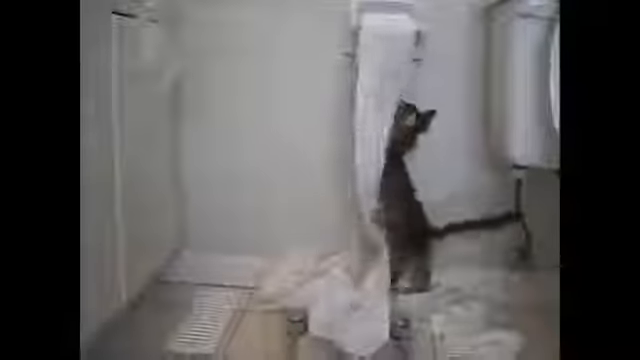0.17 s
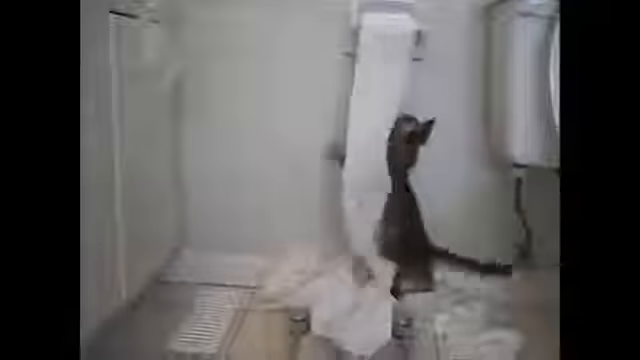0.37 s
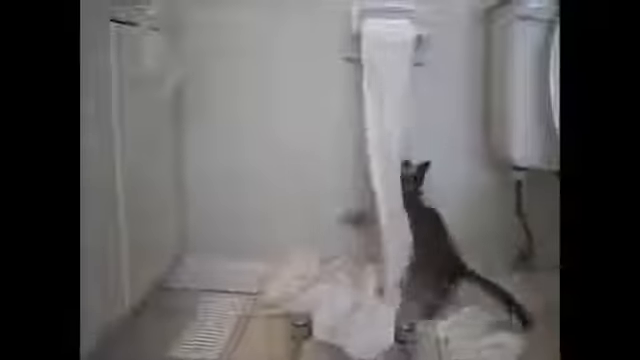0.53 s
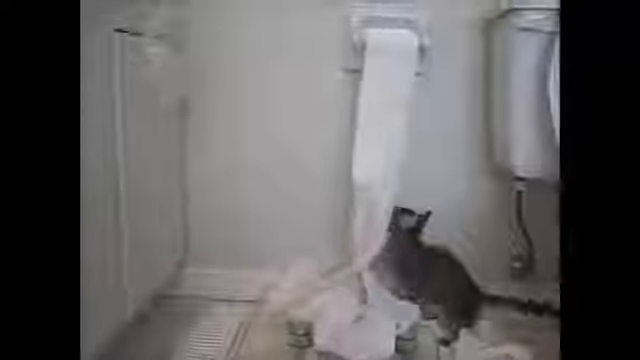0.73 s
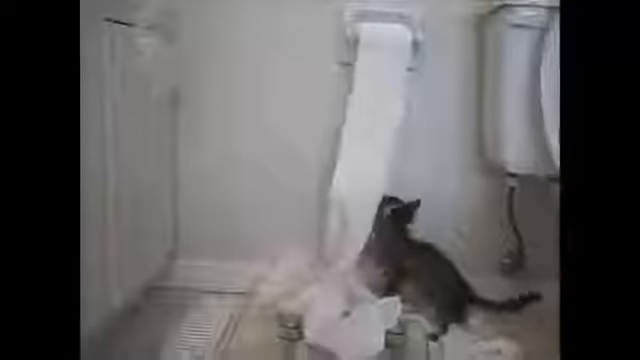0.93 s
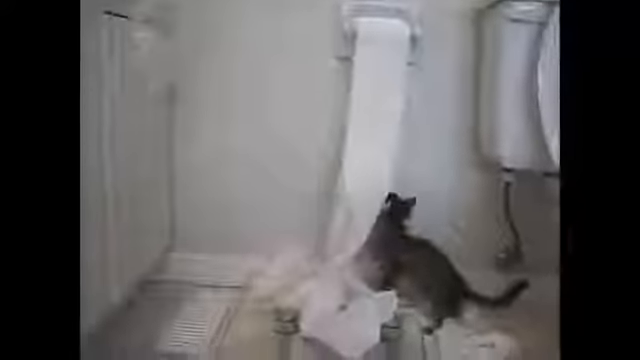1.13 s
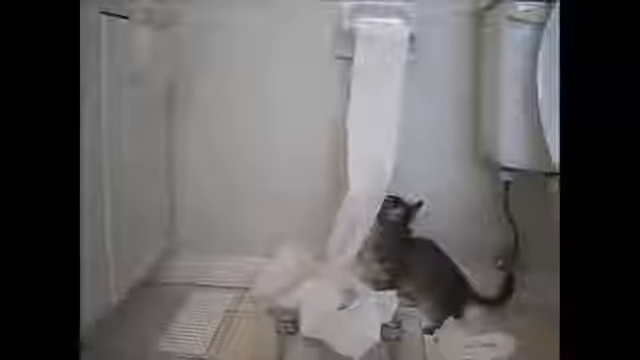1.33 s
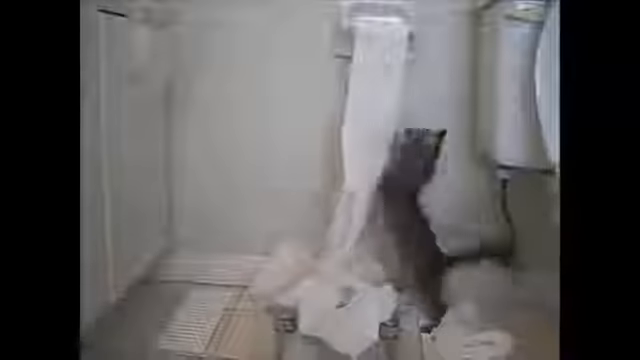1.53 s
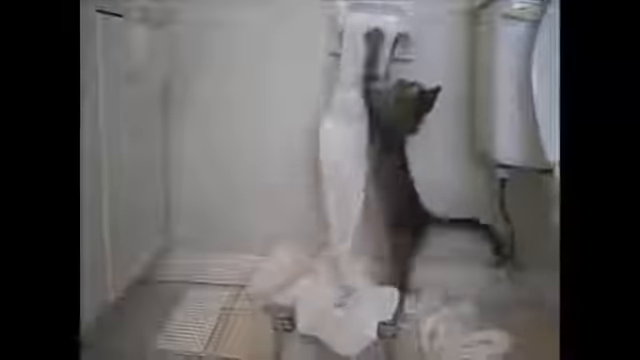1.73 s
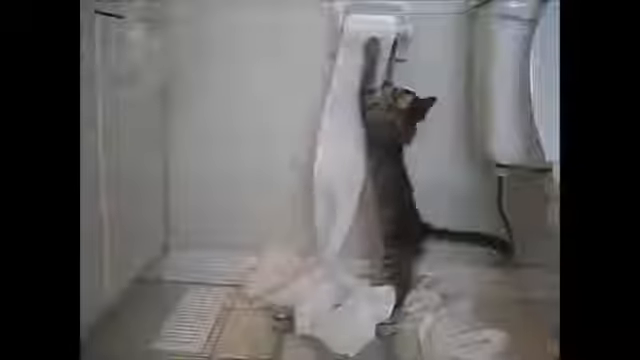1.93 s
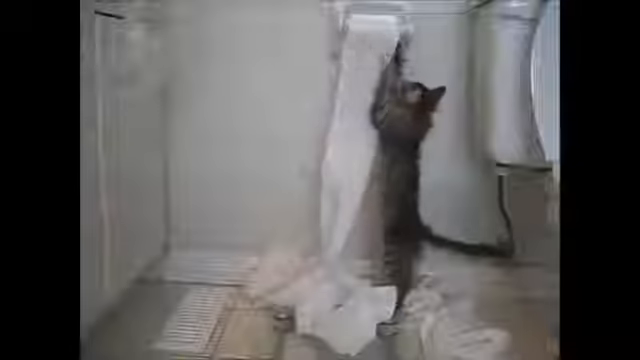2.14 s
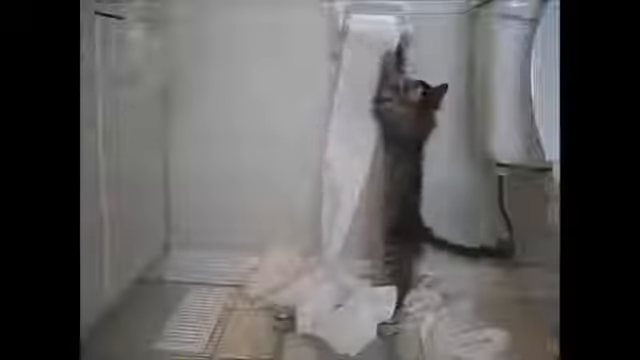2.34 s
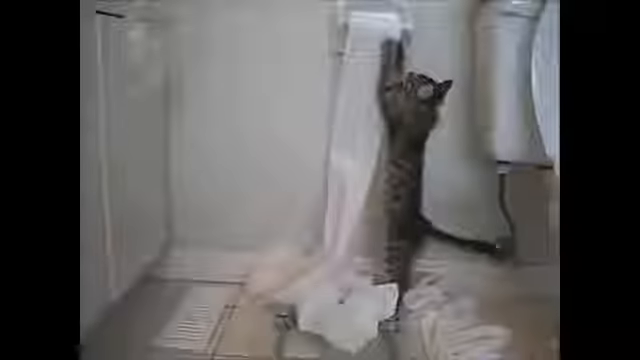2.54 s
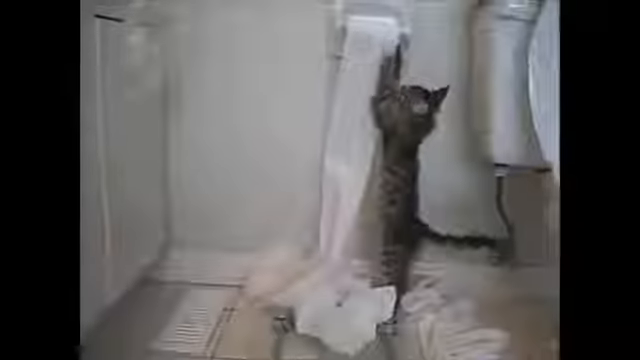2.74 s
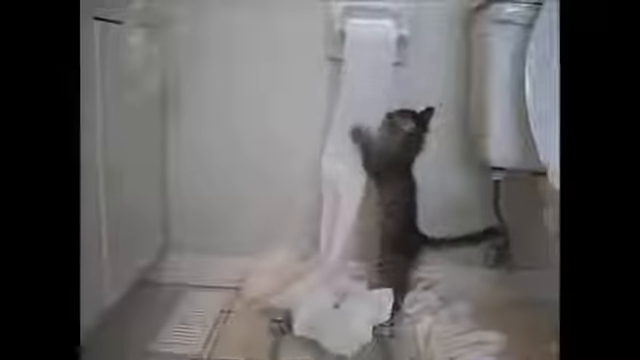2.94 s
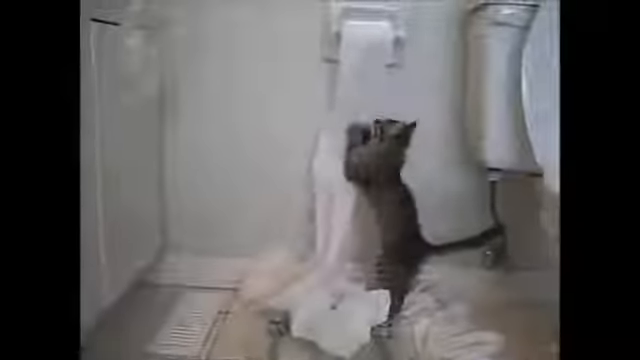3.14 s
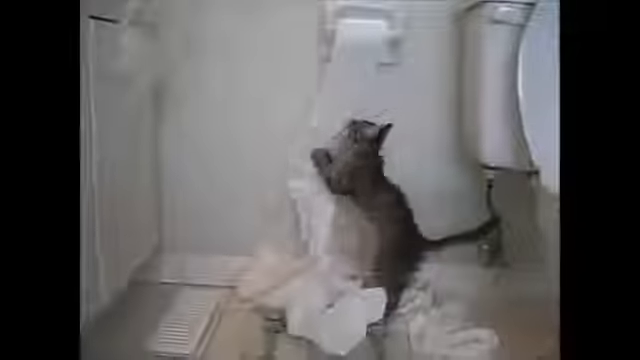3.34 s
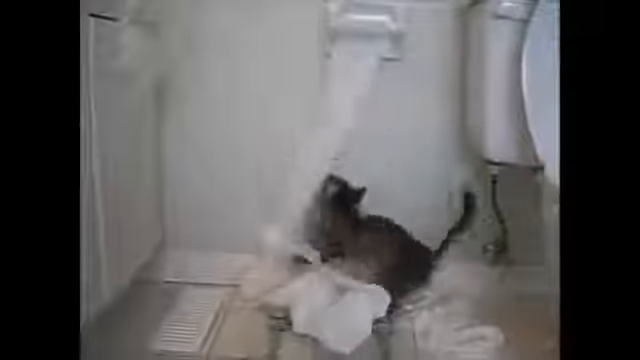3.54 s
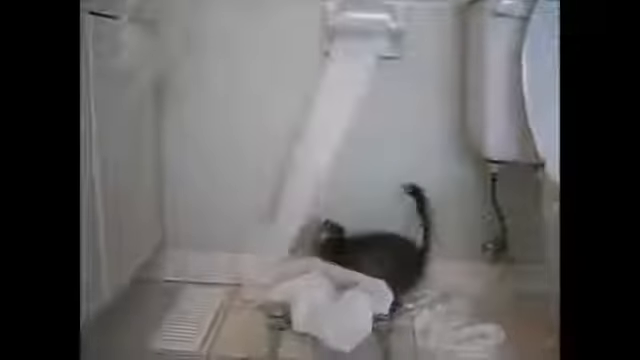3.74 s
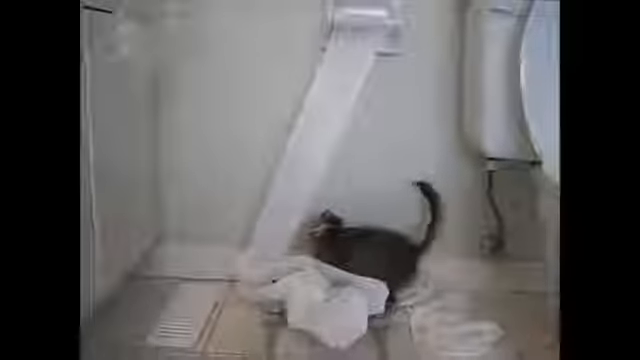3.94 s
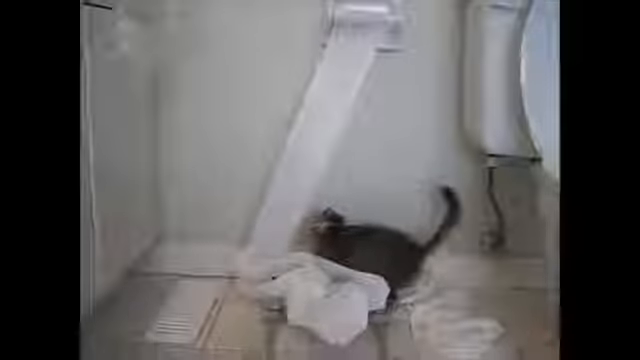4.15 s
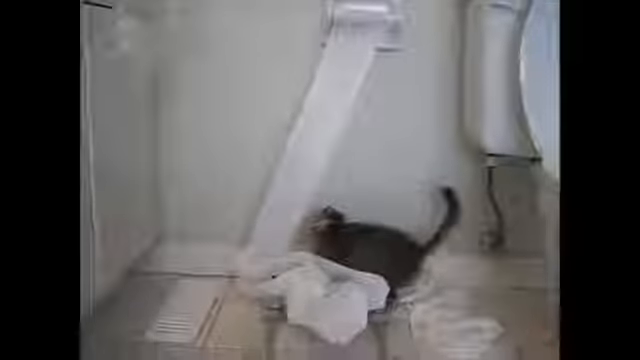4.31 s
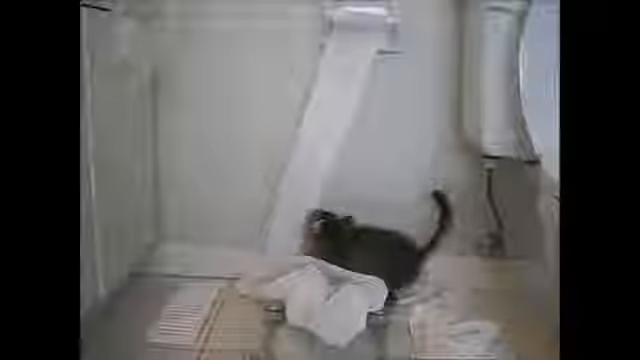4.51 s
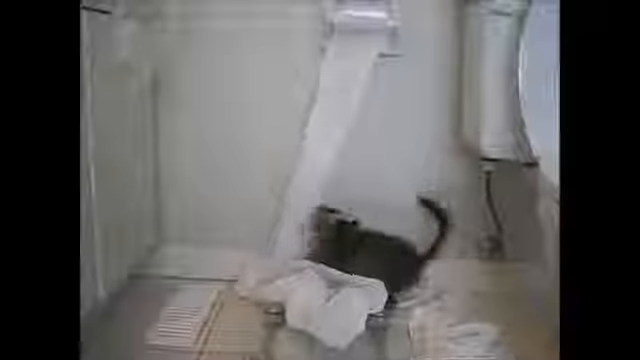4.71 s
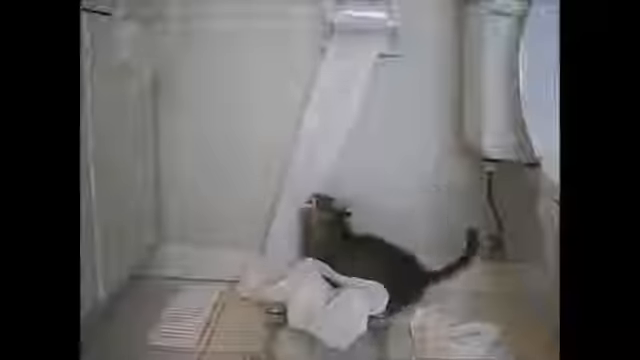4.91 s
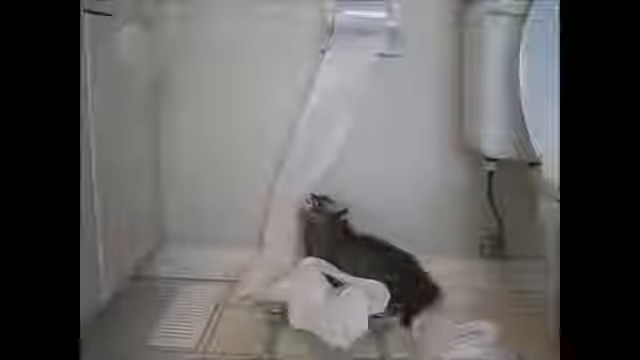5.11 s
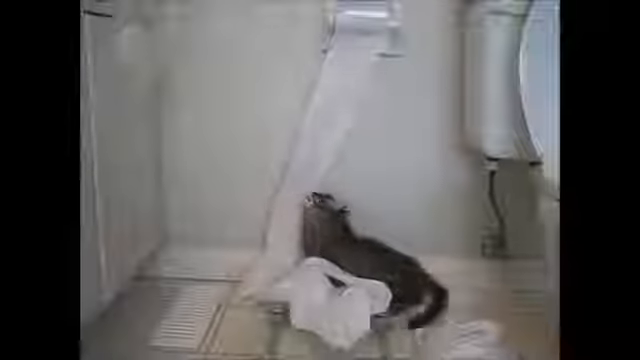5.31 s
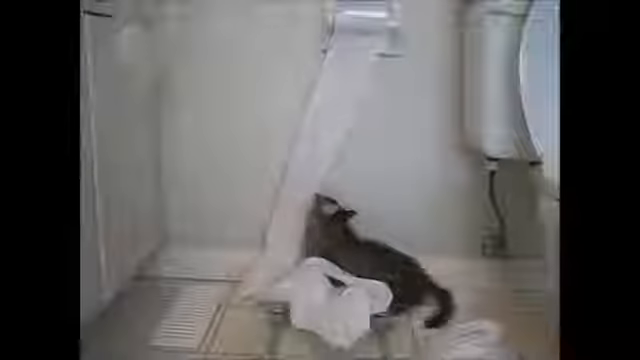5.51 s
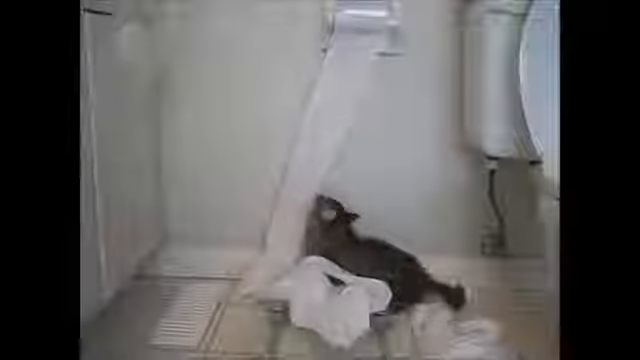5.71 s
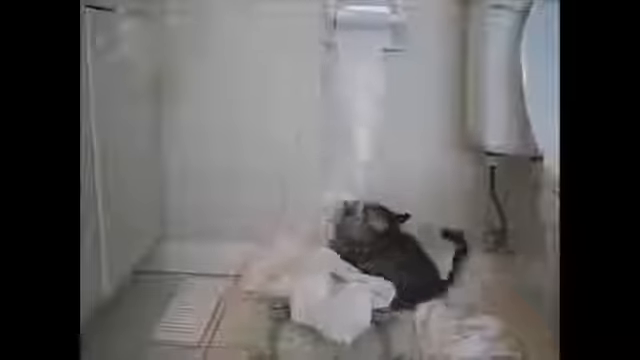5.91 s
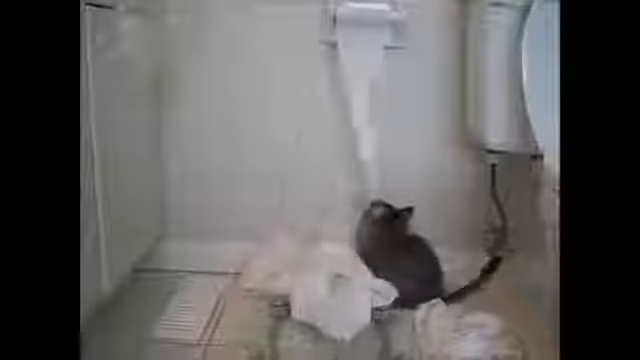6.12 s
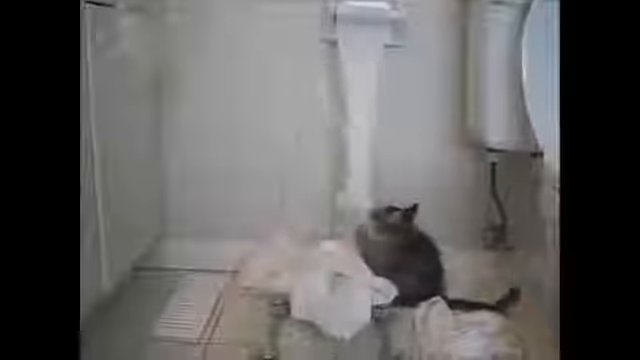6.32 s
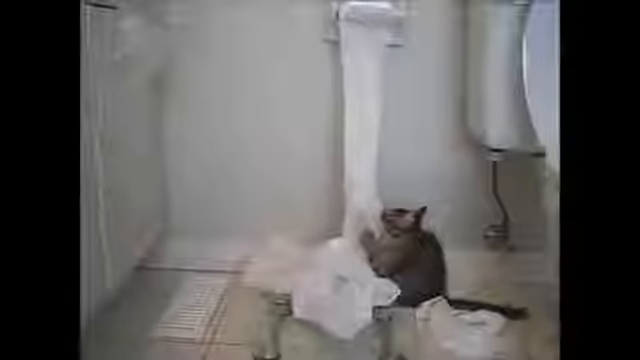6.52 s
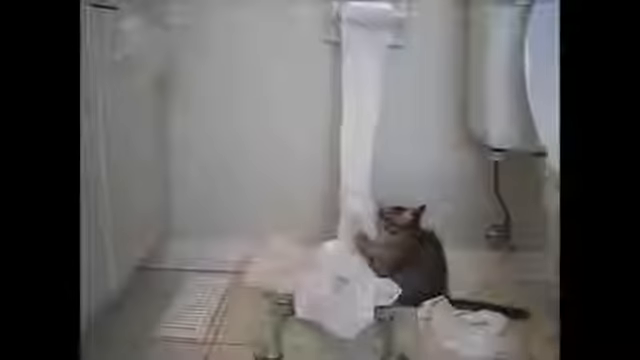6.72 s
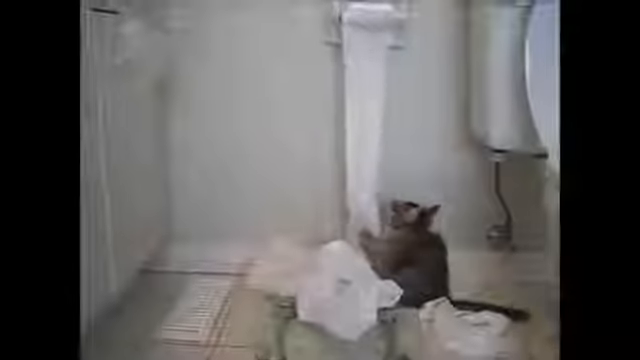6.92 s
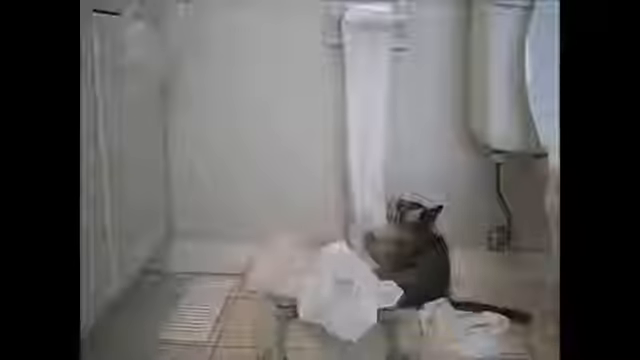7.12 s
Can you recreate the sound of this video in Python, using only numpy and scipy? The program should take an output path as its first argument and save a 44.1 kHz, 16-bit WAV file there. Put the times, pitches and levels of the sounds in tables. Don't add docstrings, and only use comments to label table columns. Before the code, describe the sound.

A small tiled bathroom with faint vent hiss and hum. At once, hard metallic clacks and hollow bumps jolt the roll holder, tailing into rustle and a low roll rumble until about 0.3 s. Paper strokes swell from 0.5 s, with another knock and rattle near 0.7 s, then it quiets to faint stirring. At 1.7 s a strong double slam rings the holder, followed by long swishing paper strokes to 2.1 s and a clack at 2.15 s. Light ticks lead to a hollow tube knock at 2.85 s. Spindle taps and claw snags gather from 3.1 s, peaking in loud clacks and a rough rush of paper around 3.5-3.65 s. Then mostly quiet, with small scratches near 4.5 and 5.3 s. From 5.77 s crisp creases snap and crumple, busiest between 6.3 and 6.85 s with a sharp snap at 6.7 s, fading by 7.3 s.

```python
import sys
import numpy as np
from scipy import signal
from scipy.fft import rfft, irfft, next_fast_len
from scipy.io import wavfile
from scipy.ndimage import uniform_filter1d, map_coordinates

SR = 44100
rng = np.random.default_rng(int(sys.argv[2]) if len(sys.argv) > 2 else 0)


def gain_from_decibels(decibels):
    exponent = np.asarray(decibels, float) / 20
    return 10 ** exponent


def master_out(mix):
    frames = np.transpose(np.atleast_2d(mix))
    ceiling = np.clip(frames, -1, 1)
    pcm = np.round(ceiling * 32767).astype(np.int16)
    wavfile.write(sys.argv[1], SR, pcm)


N = 320166

# pitch_hz, width_hz, level_db
BRACKET_MODES = [(3150, 500, -10), (4050, 340, 0), (4650, 300, -3)]
# pitch_hz, width_hz, level_db
SPRING_MODES = [(5400, 280, -2), (5800, 250, 0), (6130, 250, -1)]
# pitch_hz, width_hz, level_db
CRACK_MODES = [(8746.5, 4516, -12.5), (11968, 3442, -15.5)]
# pitch_hz, width_hz, level_db
TUBE_MODES = [(1560, 160, -2), (1790, 240, 0), (1990, 200, -1), (2600, 600, -8), (3135, 55, -5)]
# pitch_hz, width_hz, level_db
WALL_MODES = [(167.94, 18.14, -4), (225, 50, -7.5), (425.4, 113.35, -1.5), (528.84, 58.77, 4.5),
              (860, 555.9, -2)]
# pitch_hz, width_hz, level_db
PLATE_MODES = [(4841.3, 340, -0.5), (5579, 710, -7.5), (2509.3, 390, -5)]
# start_s, bracket_db, spring_over_bracket_db, room_share_db
CLACKS = [(0.044, -18.5, -4.5, -2.5), (0.074, -26, -6, -5.5), (0.1491, -34, 1, -12), (0.189, -26.5, -3, -3),
          (0.594, -31, -3, -1.5), (0.7206, -32, -5, 3.5), (0.7279, -26.5, -4, -23), (1.683, -16, -4, -3.5),
          (1.6861, -18.5, 0.5, -11), (1.7442, -25, -2.5, 3), (2.006, -38, 3.5, 0), (2.1558, -23, 2, -2),
          (2.1593, -28, 1, -7.5), (2.4763, -42.5, -5, 2.5), (2.486, -44.5, -4.5, -1.5),
          (2.496, -47, -2, -1.5), (2.554, -47.5, -4.5, 7), (2.564, -44.5, -7.5, 2), (2.58, -44, -2.5, -2),
          (2.598, -40, -1.5, -0.5), (2.614, -42.5, -0.5, -4.5), (2.718, -43.5, 0, -2.5),
          (2.745, -45, -2.5, -2), (2.757, -44, 2, -7), (2.765, -43.5, -1.5, -3.5), (2.849, -29, -5, -1),
          (3.2536, -40.5, -12.5, -3), (3.3646, -33.5, -5, -1.5), (3.42, -43, -4.5, 6),
          (3.465, -31, -4, 4.5), (3.495, -19, -4.5, -5), (3.517, -34, 6.5, 4.5), (3.5389, -16, -11, -11),
          (3.5512, -30, -3, -6), (3.5798, -30, -2.5, 2), (4.864, -47.5, -15, -6.5), (1.138, -60, -7, -5),
          (1.373, -59, -12, -8), (3.18, -42, -4.5, -3), (3.234, -48, -2.5, -4.5), (3.319, -48, -6, 2),
          (3.479, -39, 1.5, -3), (6.262, -40, -3, -2.5), (6.335, -40.5, -3, -5.5), (6.576, -43.5, -4.5, -5),
          (6.635, -42, -4.5, -3), (6.65, -45.5, -6.5, -4.5), (6.68, -42, -3.5, -2),
          (6.713, -39.5, -5.5, -4), (6.731, -41, -3, -5), (6.812, -43, -9.5, -3)]
# start_s, tube_db, thud_over_tube_db, room_share_db
BUMPS = [(0.0446, -20, -6.5, 0.5), (0.074, -25.5, -3.5, -8.5), (0.149, -32.5, -11.5, -19),
         (0.1883, -35, -6, -13), (0.5937, -28, -4, -12), (0.7218, -42.5, -5, 9.5), (0.7275, -29, -9.5, -2),
         (1.033, -48.5, -14.5, -2), (1.042, -54.5, 0.5, -8.5), (1.683, -21, -12, 0.5),
         (1.6872, -26, -4, -1), (1.741, -24.5, -11, 3), (2.007, -51.5, -28.5, -12),
         (2.1569, -35.5, -11.5, -3), (2.598, -50.5, -13.5, 0.5), (2.761, -47, -9, -6.5),
         (2.8489, -35, -14.5, 5.5), (2.8666, -16.5, -18.5, 0), (2.876, -19, -27.5, -31.5),
         (3.18, -49, -0.5, -4), (3.2544, -45.5, -6, 1.5), (3.318, -42.5, -9.5, 1.5),
         (3.3659, -37.5, -13.5, 0), (3.421, -43.5, -4.5, 0), (3.4666, -35, -3.5, -2), (3.516, -36, -6.5, 9),
         (3.5378, -23.5, -14, -2.5), (3.5787, -49.5, 8.5, 2.5), (5.331, -46, -3, -3), (6.368, -52, 10, 0)]
# start_s, level_db, room_share_db
SLAMS = [(0.0445, -30, 2.5), (0.1493, -36, -4.5), (0.7277, -36, -3.5), (1.6708, -33, 3.5),
         (1.6832, -21, -1), (1.6867, -21, 3), (1.745, -22.5, 4), (2.1561, -32.5, -1.5), (2.8492, -38, 4.5),
         (3.4973, -27, -0.5), (3.5391, -28, 1), (3.572, -27, 0.5), (3.611, -31, 1)]

# pitch_hz, width_hz, level_db
PIN_MODES = [(580, 50, -11), (980, 60, -12), (1280, 60, -6), (1370, 45, 0), (1780, 90, -11)]
# start_s, peak_db
PIN_TAPS = [(0.258, -33.5), (0.66, -39.5), (0.732, -25), (1.0415, -40.5), (1.056, -42.5), (1.205, -49),
            (2.4758, -44.5), (2.7435, -66.5), (3.141, -44), (3.1805, -29), (3.2547, -34), (3.32, -27),
            (3.3649, -32.5), (3.42, -30.5), (3.4656, -28), (4.402, -46.5), (5.3328, -43.5)]
# start_s, hold_s, fall_s (per 20 dB), level_db
CHATTERS = [(0.055, 0.00747, 0.0251, -28), (0.275, 0.00691, -0.0062, -50.5), (0.724, 0.06044, -0.0561, -40),
            (1.051, 0.0183, 0.6823, -62), (1.689, 0.06, 0.12, -39), (2.009, 0.07, 0.1, -52),
            (2.47, 0.02, 0.1, -53), (2.555, .02, 0.1, -57), (2.6, .01, .1, -57), (2.74, 0.04, .15, -55),
            (2.866, 0.00913, 0.0478, -32), (3.183, 0.01082, 0.1912, -50.5), (3.317, 0.00799, 0.1754, -41),
            (3.472, 0.13285, 0.0811, -33.5)]

# pitch_hz, level_db (per Hz)
TISSUE_COLOUR = [(180, -41.5), (300, -16), (985, -6), (1070, -4.5), (1260, -5), (2140, -6), (2280, -4.5),
                 (2440, -4), (10800, -15.5), (15500, -21)]
# full_s, rise_s (per 20 dB), hold_s, fall_s (per 20 dB), rustle_db
STROKES = [(.05, .005, .04, .15, -36), (0.19, 0.1672, 0.01231, 0.0792, -36),
           (0.502, 0.022, 0.0546, 0.0965, -44), (0.575, 0.071, 0.01083, 0.0453, -41),
           (0.62, 0.1793, 0.02305, 0.0994, -39.5), (0.71, 0.069, 0.00917, 0.346, -44.5),
           (1.418, .012, 0.0523, .04, -50), (1.465, .04, .045, 0.2256, -52),
           (1.668, 0.0086, 0.0401, 0.2057, -35.5), (1.84, 0.1176, 0.02131, -0.0232, -34.5),
           (2.0, 0.1084, 0.07831, -0.1328, -35.5), (2.15, -0.4679, 0.0098, 0.1523, -52),
           (2.449, 0.0191, 0.02024, 0.1437, -55.5), (2.485, 0.0169, 0.01137, 0.0864, -48),
           (2.575, -0.1355, 0.04086, 0.3026, -54), (2.757, 0.0154, 0.01128, 0.0565, -42),
           (3.14, 0.1281, 0.00392, 0.2823, -48), (3.4, 0.0571, 0.00917, 0.1202, -39.5),
           (3.52, 0.0114, 0.085, 0.07, -28), (3.63, .1, .052, .025, -31.5), (3.7, 0.3, 0.01, 0.14, -48),
           (4.478, -0.0046, 0.0396, 0.2265, -52.5), (4.555, 0.1, 0.015, 0.12, -43.5),
           (5.333, 0.03, 0.004, 0.12, -51.5), (5.772, 0.0142, 0.00622, -0.0014, -47),
           (5.803, -0.0223, 0.00831, 0.0061, -45.5), (5.88, 0.11, 0.2816, 0.6387, -49.5),
           (6.065, 0.0707, 0.01842, 0.1604, -46), (6.372, 0.0657, 0.02546, 0.1556, -40),
           (6.49, 0.284, 0.0223, 0.091, -47), (6.75, 0.6515, 0.01161, 0.2315, -48.5)]
# start_s, rustle_db
STIRRING = [(0, -57.5), (0.3, -61), (1.05, -63.5), (1.4, -68.5), (1.56, -57.5), (2.25, -69), (2.42, -70.5),
            (2.82, -62.5), (3.08, -62.5), (3.93, -61), (4.45, -77), (4.68, -58), (5.14, -56), (5.3, -63),
            (5.75, -64), (5.85, -59), (6.7, -55.5), (6.92, -62.5), (7.26, -71.5)]
# full_s, rise_s (per 20 dB), hold_s, fall_s (per 20 dB), hiss_db
HISSES = [(0.5, -0.0162, 0.0953, -0.0176, -57), (0.62, 0.0584, 0.02192, 0.023, -43.5),
          (1.84, 0.1354, 0.027, 0.2764, -45), (1.957, .01, .05, .1, -46),
          (2.49, 0.161, 0.01734, 0.2753, -58), (2.742, 0.0355, 0.0061, 0.0018, -47),
          (2.757, 0.0314, 0.00926, 0.0487, -44.5), (4.49, -0.0212, 0.0196, -0.4984, -63),
          (4.52, 0.1028, 0.042, -0.1649, -53.5), (5.8, 0.0319, .01, -0.0842, -49),
          (6.35, 0.0731, 0.0897, 0.3058, -49.5), (6.72, 0.059, 0.02066, 0.1742, -47.5)]
# start_s, peak_db, tilt_db
CLAWS = [(0.4799, -50.5, -8), (0.4982, -41.5, -14.5), (0.5062, -36.5, -7.5), (1.419, -42, -3.5),
         (0.144, -28, 1.5), (1.668, -22, -2.5), (1.954, -39, 2), (2.0589, -31, 5.5), (2.074, -25, 0.839),
         (2.1493, -32.5, -5), (2.152, -26, -1.5), (2.7393, -40.5, 8), (1.674, -26, -2.5),
         (1.678, -26.5, -4), (0.7204, -30, -6), (3.437, -37, -3), (2.853, -28, 8.5), (2.866, -35, 3.5),
         (3.1391, -42, 6), (3.1506, -30, -3.5), (3.197, -31.5, -8), (3.391, -37, -10),
         (4.5158, -37.5, -6.5), (4.553, -40.5, 1), (5.272, -54, 10), (5.3334, -36.5, -5.5), (5.34, -40, -6),
         (4.53, -42.5, 1), (4.567, -43.5, -1)]
# start_s, peak_db, tilt_db
CREASES = [(5.7699, -32, -9), (5.784, -26.5, -4), (5.801, -21, -4), (5.805, -32.5, -2.5),
           (5.8315, -31.5, -6.5), (5.8687, -40, -5.5), (6.031, -40.5, 1), (5.953, -36, -3),
           (6.05, -37, -6.5), (6.0626, -33, -6.5), (6.078, -38.5, -6), (6.1191, -37, -2.5),
           (6.145, -36.5, -5.5), (6.171, -31.5, -6.5), (6.2621, -29, 1.5), (6.287, -30, -6),
           (6.315, -42, 8.5), (6.336, -27.5, -2.5), (6.352, -33, 0.5), (6.368, -26, -7), (6.378, -29, -0.5),
           (6.474, -34, 0), (6.51, -36, -4.5), (6.3882, -31.5, 5), (6.4813, -32, 2), (6.489, -34, 0.5),
           (6.498, -28, -3), (6.5533, -32.5, -1.5), (6.546, -35.5, 2.5), (6.576, -38, -1.5),
           (6.6033, -34.5, -1), (6.6091, -35.5, -4), (6.6346, -24.5, -5), (6.65, -35, -1),
           (6.677, -31.5, 0.5), (6.681, -30, 0.5), (6.697, -30.5, -2.5), (6.712, -20.5, -6),
           (6.718, -30.5, -3), (6.732, -33, 0), (6.745, -36.5, 0.5), (6.766, -38, -6), (6.82, -30.5, -2.5),
           (6.811, -27, -4), (6.84, -33, 2), (7.027, -47, 6.5), (7.044, -46, 2.5)]
# pitch_hz, width_hz, level_db
TUG_MODES = [(3870, 320, 0), (4700, 300, -5)]
# start_s, hold_s, fall_s (per 20 dB), level_db, pitch_hz
DRAGS = [(0.657, 0.15, 0.2055, -49.5, 1380), (3.182, .27, 0.0068, -51.5, 1390),
         (1.04, 0.0404, 0.0233, -53.5, 1244), (1.058, .012, .03, -64, 4200), (1.215, .07, .08, -63, 1600),
         (1.38, .022, 0.0189, -60, 900), (2.008, .03, .05, -44, 2230), (0.7255, 0.0726, 0.0353, -49, 2520),
         (5.835, 0.1936, -0.0091, -58.5, 1760), (6.46, .3, .1, -59, 3850), (6.728, .035, 0.08, -53, 4720)]

# pitch_hz, level_db (per Hz)
RUMBLE_COLOUR = [(29, -34), (50, -14), (177, 0), (322, -5.5), (358, -5), (526, -5.5), (601, -4.5),
                 (795, -15.5), (957, -5), (1200, -2.5), (1560, -12), (2640, -120)]
# full_s, rise_s (per 20 dB), hold_s, fall_s (per 20 dB), rumble_db
TURNS = [(0.06, 0.2038, 0.24834, -0.0395, -41.5), (0.62, 0.0863, 0.0602, 0.1821, -41),
         (0.8, 1.2927, 0.01806, .5, -47), (1.56, 1.89, 0.0687, -0.59, -70),
         (1.77, 0.1494, 0.04156, 0.1102, -35.5), (1.9, 1.03, 0.0264, 0.3238, -56),
         (2.04, 0.3964, 0.0947, 0.2208, -51), (2.53, -0.388, 0.01443, -1, -65.5),
         (2.87, 0.0875, 0.04243, 0.1854, -45.5), (3.2, 0.1526, 0.01758, 0.3967, -50),
         (3.4, 0.2033, 0.1142, -0.0262, -46.5), (3.58, 0.106, 0.00875, 0.1542, -31),
         (3.69, 0.1839, 0.00777, 0.1956, -38), (5.335, 0.0388, 0.00445, -0.0162, -49.5),
         (6.15, 0.23, 0.01987, 0.6715, -53), (6.37, 0.1675, 0.04313, 0.2927, -43)]

# pitch_hz, fade_s (to fall 60 dB)
TILE_FADE = [(100, .5), (300, .5), (800, .46), (2000, .42), (5000, .39), (13000, .3)]
# pitch_hz, width_hz, level_db
STANDING_WAVES = [(158, 6, 8), (212, 10, 5)]
# pitch_hz, level_db (per Hz)
AIR_COLOUR = [(12, -29.5), (20, -4.5), (76, -6.5), (126, -13), (306, -8.5), (342, -12.5), (686, -15),
              (906, -4.5), (1040, -13.5), (2920, -20.5), (4190, -18), (7950, -24), (15500, -31.5)]
# pitch_hz, width_hz, level_db (over the air)
VENT_TONES = [(311.1, 49.37, 8), (916.27, 72.83, 3), (1158.6, 50.16, 1.5), (7721, 34.6, 8)]

DROPOUTS = [
    0.0345,
    2.144,
    2.84,
]
SHARP_BLOWS = [
    0.046,
    1.686,
    1.746,
    2.158,
    2.853,
    3.15,
    3.498,
    5.803,
    6.714,
]


def unit(x):
    return x / np.sqrt(np.mean(x ** 2) + 1e-20)


def along(points, hz):
    f, value = np.transpose(points)
    return np.interp(np.log(hz + 1), np.log(f + 1), value)


def treble(hz, edge_hz, order=4):
    return 1 / (1 + (edge_hz / (hz + 1)) ** order)


def wobble(rate):
    knots = rng.standard_normal(int(N * rate / SR) + 4)
    return map_coordinates(knots, [np.arange(N) * rate / SR])


def filtered(x, response):
    size = next_fast_len(N + SR // 2)
    spectrum = rfft(x, size) * response(np.fft.rfftfreq(size, 1 / SR))
    return irfft(spectrum, size)[..., :N]


def body(modes):
    def response(f):
        total = 0
        for k, (centre, width, db) in enumerate(modes):
            loss = 1j * f * abs(width)
            total = total + (-1) ** k * gain_from_decibels(db) * loss / (centre * centre - f * f + loss)
        return total
    return response


def bursts(s, length_ms, *levels_db):
    u = np.arange(1024) / SR / (np.clip(length_ms, .5, 12)[:, None] / 1000)
    shape = (1 - np.exp(-8 * u)) * np.exp(-u ** 3)
    z = rfft(rng.standard_normal((len(s), 1024)) * shape, axis=1)
    rough = irfft(z / np.abs(z) ** .7, 1024, axis=1) * shape
    rough /= np.sqrt((rough ** 2).sum(axis=1, keepdims=True) / shape.sum(axis=1, keepdims=True))
    at = (np.round(s * SR).astype(int)[:, None] + np.arange(1024)).ravel()
    return [np.bincount(at, (gain_from_decibels(db)[:, None] * rough).ravel(), N + 1024)[:N] for db in levels_db]


def patches(x, depth_db):
    z = signal.stft(x, nperseg=512)[2]
    field = uniform_filter1d(rng.standard_normal(z.shape), size=9, axis=0)
    field = uniform_filter1d(field, size=8, axis=1)
    return signal.istft(z * gain_from_decibels(depth_db * unit(field)), nperseg=512)[1][:N]


def swells(rows):
    s, rise, hold, fall, db = np.transpose(rows)[:, :, None]
    since = np.arange(N * 1000 // SR + 2) / 1000 - s
    rising_db = 20 * np.minimum(since, 0) / np.abs(rise)
    falling_db = 20 * np.maximum(since - np.abs(hold), 0) / np.abs(fall)
    return db + rising_db - falling_db, since


def per_sample(v):
    return np.interp(np.arange(N) / SR, np.arange(len(v)) / 1000, v)


def total_db(levels_db):
    return per_sample(10 * np.log10(np.sum(gain_from_decibels(2 * levels_db), axis=0) + gain_from_decibels(-300)))


def knocks():
    clack_s, bracket_db, spring_db, clack_room_db = np.transpose(CLACKS)
    bump_s, tube_db, thud_db, bump_room_db = np.transpose(BUMPS)
    slam_s, slam_db, slam_room_db = np.transpose(SLAMS)
    # (modes, s, level dB, room share dB)
    parts = [(BRACKET_MODES, clack_s, bracket_db + 15.5, clack_room_db - 3),
             (SPRING_MODES + CRACK_MODES, clack_s, bracket_db + spring_db + 13.5, clack_room_db - 0.78),
             (TUBE_MODES, bump_s, tube_db + 15.5, bump_room_db + 0.5),
             (WALL_MODES, bump_s, tube_db + thud_db + 18, bump_room_db + 3.5),
             (PLATE_MODES, slam_s, slam_db + 14, slam_room_db)]
    total = np.zeros((2, N))
    for modes, s, level_db, share_db in parts:
        contacts = bursts(s, np.full(len(s), 4.3), level_db, level_db + share_db)
        total += filtered(np.array(contacts), body(modes))
    return total


def snaps():
    s, db, tilt_db = np.transpose(CLAWS + CREASES)
    tug_db = np.repeat([0, -5.5], [len(CLAWS), len(CREASES)])
    length_ms = np.full(len(s), 5.924)
    sharp_db = db + tilt_db
    dull, sharp, tug = bursts(s, length_ms, db - tilt_db - 8, sharp_db + 4.5, sharp_db + tug_db - 4.5)
    colour = lambda hz: gain_from_decibels(along(TISSUE_COLOUR, hz))
    paper = filtered(dull, lambda hz: colour(hz) * (1 - treble(hz, 3500)))
    paper = paper + filtered(sharp, lambda hz: colour(hz) * treble(hz, 3500))
    return patches(paper, depth_db=2.5) + filtered(tug, body(TUG_MODES))


def stroking():
    stroke_db, since = swells(STROKES)
    stir_s, stir_db = np.transpose(STIRRING)
    stir_db = np.interp(np.arange(N) / SR, stir_s, stir_db)
    rustle_db = 10 * np.log10(gain_from_decibels(2 * total_db(stroke_db)) + gain_from_decibels(2 * stir_db))
    weight = gain_from_decibels(2 * np.maximum(stroke_db, -150))
    age_s = per_sample((weight * np.clip(since, -.05, .2)).sum(0) / weight.sum(0))
    start_db, brighten_db_per_s = -0.4, 6
    return rustle_db, start_db + brighten_db_per_s * age_s


def tilted(x, tilt):
    bright = filtered(x, lambda hz: treble(hz, 3500))
    return tilt * bright + (x - bright) / tilt


def rustle():
    rustle_db, tilt_db = stroking()
    hits = rng.random(N) < 700 / SR * gain_from_decibels(3.5 * wobble(22))
    creases = hits * gain_from_decibels(5 * np.minimum(rng.exponential(size=N), 2.5))
    tick = np.exp(-np.arange(128) / (0.0012 * SR))
    crackle = unit(signal.fftconvolve(creases, tick)[:N] * rng.standard_normal(N))
    crumpling = np.clip((rustle_db + 60) / 12, 0, 1)
    flutter = gain_from_decibels(1.5 * wobble(90) + 1.7 * crumpling * wobble(45))
    fibres = unit(flutter * rng.standard_normal(N) + 0.7 * crumpling * crackle)
    paper = unit(filtered(patches(fibres, depth_db=1.5), lambda hz: gain_from_decibels(along(TISSUE_COLOUR, hz))))
    tilt_db = 3 * np.tanh(tilt_db / 4)
    return gain_from_decibels(rustle_db - 1.5) * tilted(paper, gain_from_decibels(tilt_db))


def hiss():
    fits = patches(gain_from_decibels(2.9 * wobble(70)) * rng.standard_normal(N), depth_db=2.2)
    bright = filtered(fits, lambda hz: gain_from_decibels(along(TISSUE_COLOUR, hz)) * treble(hz, 3750))
    return gain_from_decibels(total_db(swells(HISSES)[0])) * unit(bright)


def spindle():
    rise_s = 0.013
    level_db = total_db(swells([(s, rise_s, *rest) for s, *rest in CHATTERS])[0])
    ticks = (rng.random(N) < 260 / SR) * rng.standard_normal(N)
    ticks = ticks + 0.0411 * rng.standard_normal(N)
    s, db = np.transpose(PIN_TAPS)
    taps, = bursts(s, np.full(len(s), 1.5), db + 21.5)
    chatter = gain_from_decibels(level_db - 3) * unit(filtered(ticks, body(PIN_MODES)))
    return chatter + filtered(taps, body(PIN_MODES))


def drag():
    rise_s, sharpness = .03, 16
    scrape = gain_from_decibels(2.1 * wobble(60)) * rng.standard_normal(N)
    levels_db = swells([(s, rise_s, hold, fall, db) for s, hold, fall, db, _ in DRAGS])[0]
    total = np.zeros(N)
    for level_db, (*_, hz) in zip(levels_db, DRAGS):
        ring = body([(hz, hz / sharpness, 0)])
        song = filtered(scrape, lambda f: ring(f) ** 2)
        song = song / (uniform_filter1d(np.abs(song), size=400) + 1e-9) ** .5
        total += per_sample(gain_from_decibels(level_db)) * unit(song)
    return total


def rumble():
    turns_db = total_db(swells(TURNS)[0])
    level_db = 10 * np.log10(gain_from_decibels(2 * turns_db) + gain_from_decibels(2 * -63))
    lumps = gain_from_decibels(2.1836 * wobble(25)) * rng.standard_normal(N)
    return gain_from_decibels(level_db - 5) * unit(filtered(lumps, lambda hz: gain_from_decibels(along(RUMBLE_COLOUR, hz))))


def bathroom(x):
    wet, step = np.zeros(N + 2 * SR), SR // 4
    for start in range(0, N, step):
        hz, t, z = signal.stft(rng.standard_normal(SR * 3 // 4), SR, nperseg=256)
        fade_db = -60 * t / along(TILE_FADE, hz)[:, None]
        tail = signal.istft(z * gain_from_decibels(fade_db), SR, nperseg=256)[1]
        tail *= 1 - np.exp(-np.arange(len(tail)) / (.004 * SR))
        answer = signal.fftconvolve(x[start:start + step], tail / np.linalg.norm(tail))
        wet[start:start + len(answer)] += answer
    return wet[:N] + filtered(x, body(STANDING_WAVES))


def air():
    def colour(hz):
        lift = 1
        for centre, width, db in VENT_TONES:
            lift = lift + gain_from_decibels(db) / (1 + (2 * (hz - centre) / width) ** 2)
        return gain_from_decibels(along(AIR_COLOUR, hz)) * lift
    return gain_from_decibels(-59 + 0.2013 * wobble(2.8205)) * unit(filtered(rng.standard_normal(N), colour))


def scene():
    hits, hits_to_room = knocks()
    tears = snaps()
    paper = rustle() + rumble() + spindle() + drag() + hiss()
    echo = bathroom(gain_from_decibels(-0.5) * hits_to_room + gain_from_decibels(-3) * tears + gain_from_decibels(-8) * paper)
    return (hits + tears + paper + echo + air())[None]


def starved(x):
    half_s = .007
    shut = sum(np.exp(-((np.arange(N) / SR - s) / half_s) ** 6) for s in DROPOUTS)
    return x - shut * filtered(x, lambda hz: treble(hz, 5000, order=12))


def limited(x):
    limits_hz = np.array([[15000], [15750]])
    low, wide = filtered(x, lambda hz: 1 / (1 + (hz / limits_hz) ** 200))
    half_s = .005
    opened = sum(np.exp(-((np.arange(N) / SR - s) / half_s) ** 4) for s in SHARP_BLOWS)
    return (low + gain_from_decibels(-10) * opened * (wide - low))[None]


def band_limit(x):
    return signal.sosfilt(signal.butter(12, 16140, fs=SR, output="sos"), x)


def record(dry):
    finished = limited(starved(dry))
    return band_limit(finished)


dry = scene()
out = record(dry)
master_out(out)
```